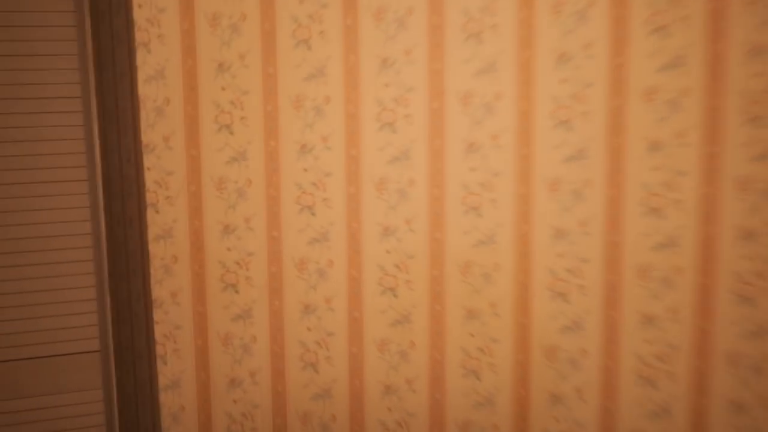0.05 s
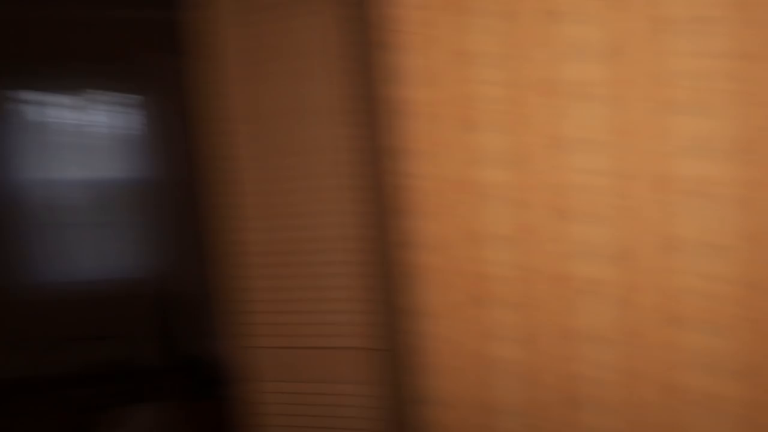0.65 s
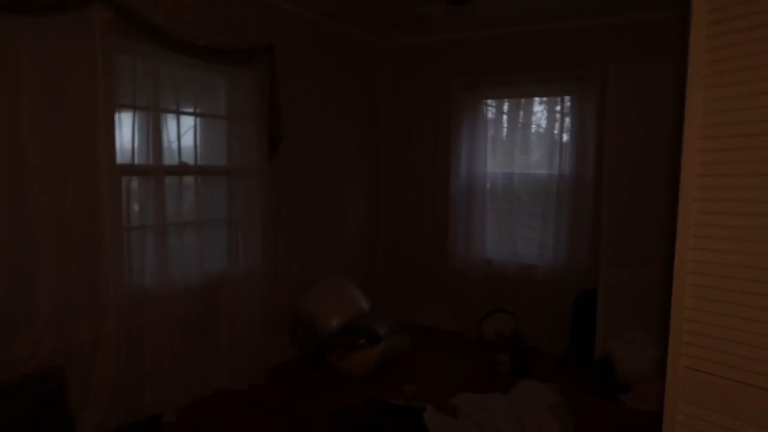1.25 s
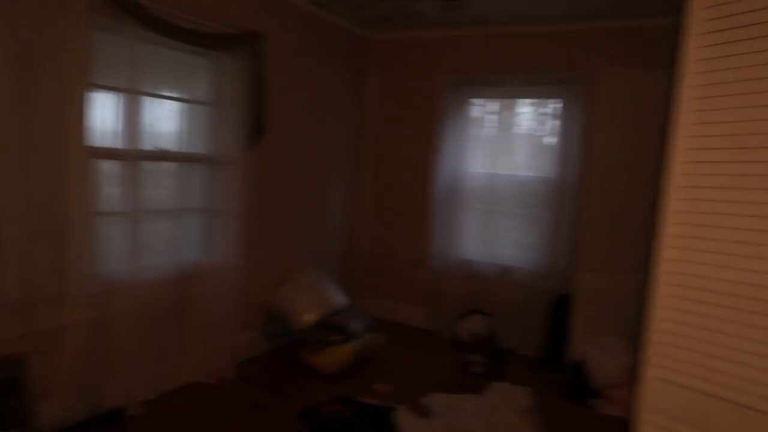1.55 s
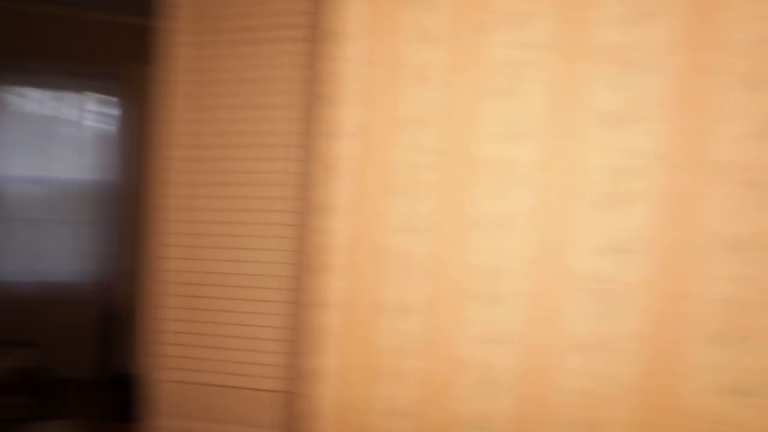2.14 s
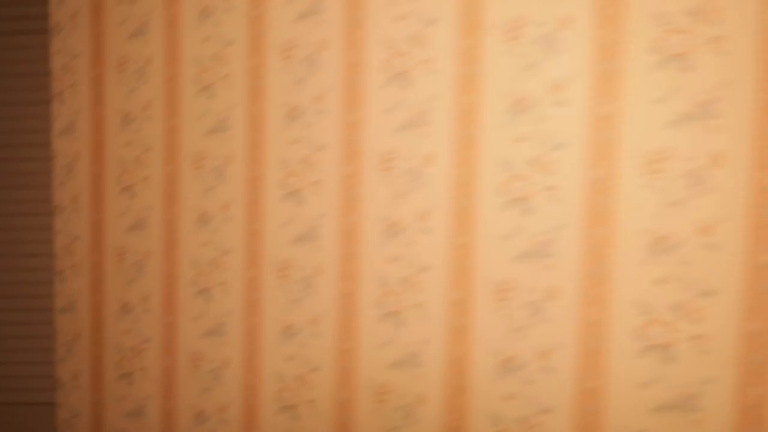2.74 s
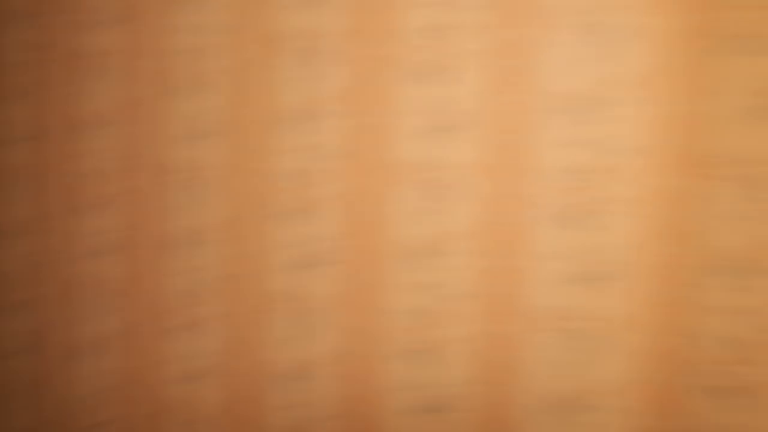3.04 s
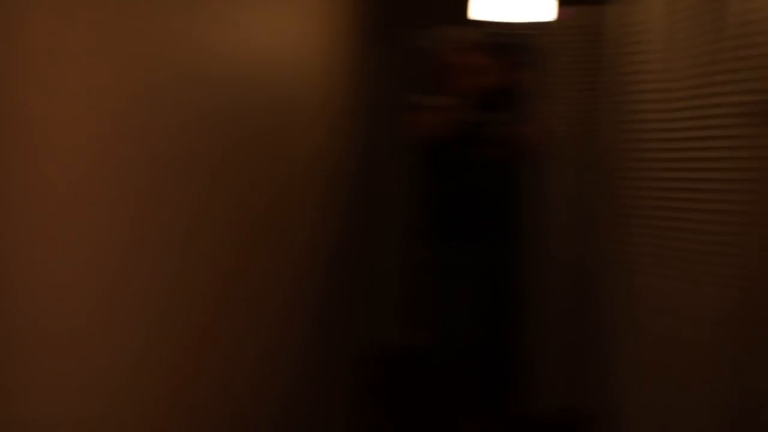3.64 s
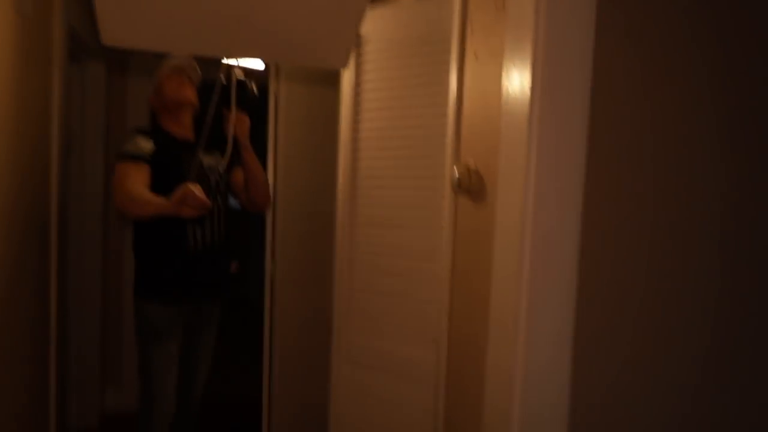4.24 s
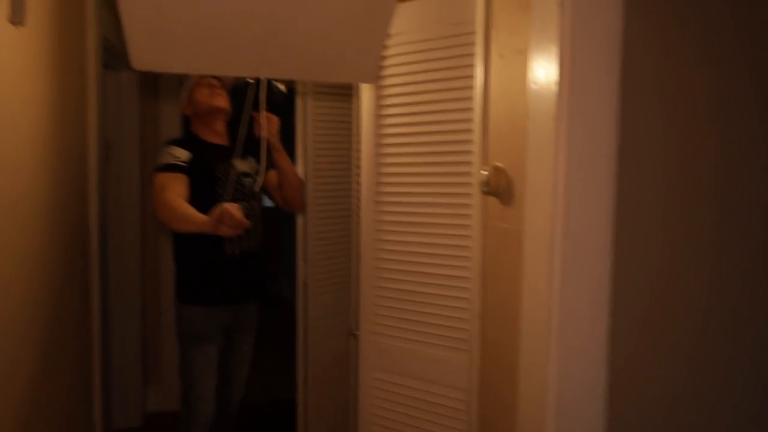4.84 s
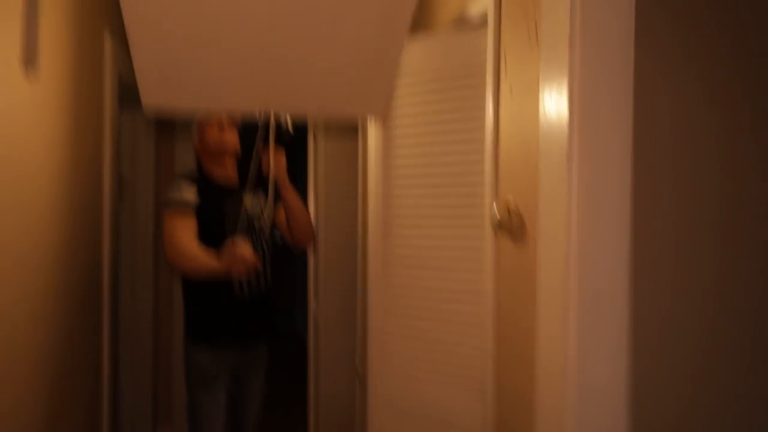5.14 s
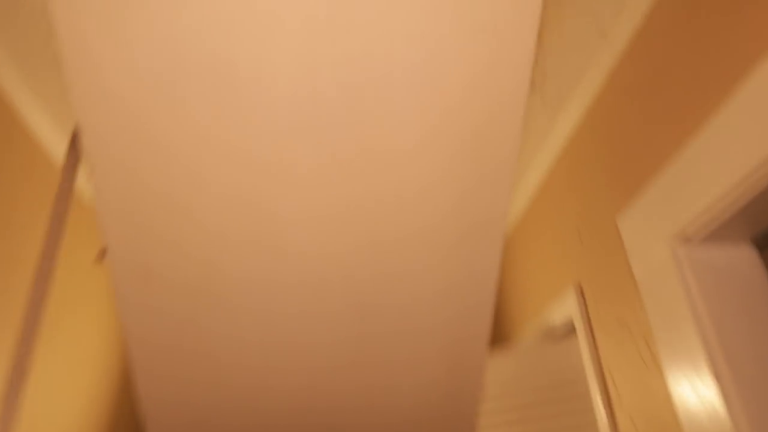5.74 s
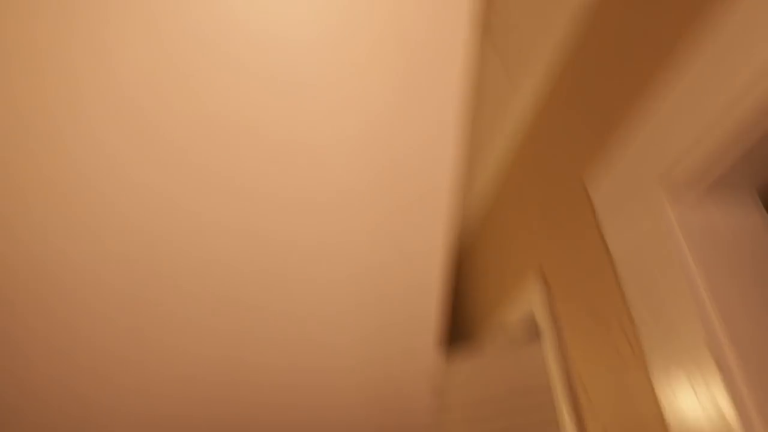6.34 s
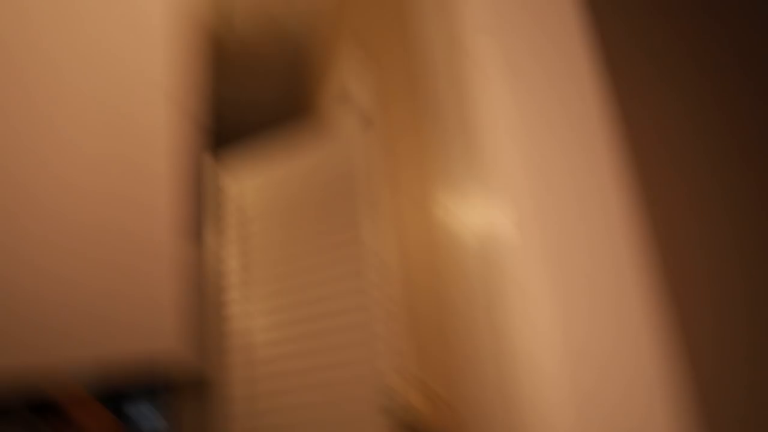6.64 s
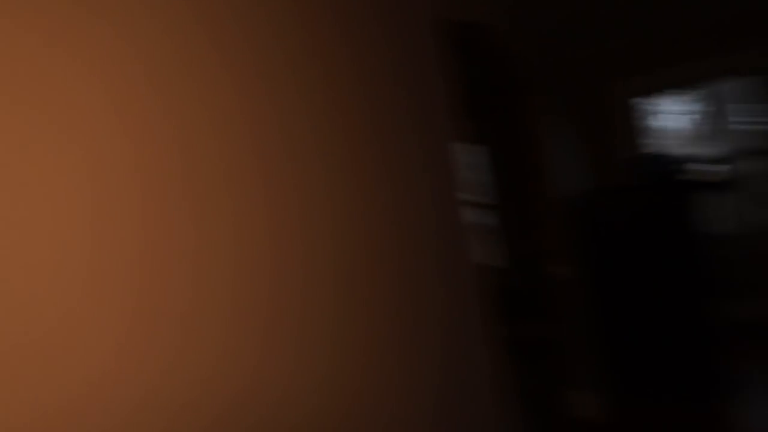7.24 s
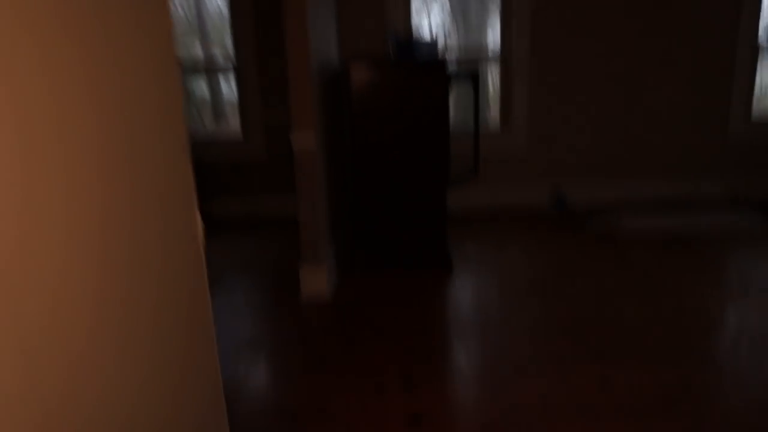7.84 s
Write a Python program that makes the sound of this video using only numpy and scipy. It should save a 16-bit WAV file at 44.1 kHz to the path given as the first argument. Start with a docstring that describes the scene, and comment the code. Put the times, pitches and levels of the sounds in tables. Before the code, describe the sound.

Soft footfalls, scuffs and small clicks open the scene in a slightly echoing wooden hallway. Suddenly the springs of a pull-down attic door twang, then rattle and rasp over a low shuddering groan, leaving a wavering metallic ring. A bright snap from a catch follows, then loud wooden knocks as the sections unfold. Feet thud on the boards near the microphone, with a few thin hinge squeaks and a light stir of clothes.

```python
"""Pulling down a folding attic door

A few steps and light knocks sound in the wooden hallway of an empty house, then the door is pulled down
by its cord. Its coil springs twang on their hooks, rattle as they slip and ring on, while the panel
groans in stick-slip on its hinge. A metal catch snaps, the wooden sections clatter open and feet thud
on the boards nearby. Fittings tick and squeak over a faint stir of clothes and feet."""
import sys
import numpy as np
from scipy import signal
from scipy.io import wavfile
from scipy.ndimage import uniform_filter1d

SR = 44100
rng = np.random.default_rng(int(sys.argv[2]) if len(sys.argv) > 2 else 0)


def to_wav(s):
    """Save 16-bit WAV."""
    ch = np.atleast_2d(s).T  # columns
    pcm = np.round(np.clip(ch, -1, 1) * 32767)  # PCM
    wavfile.write(sys.argv[1], SR, pcm.astype(np.int16))


N = 347534
TIME = np.arange(N) / SR
BANDS_HZ = 28 * 2 ** (np.arange(23) / 2.5)
BASS_HZ, MIDDLE_HZ = 170, 900

def from_db(db):
    """Decibels to gain."""
    return 10 ** (np.asarray(db) / 20)

def unit_power(x):
    """Scale to an average power of one."""
    return x / np.sqrt(np.mean(x ** 2) + 1e-20)

def at_hz(points, hz):
    """Read a curve along log frequency."""
    points = np.array(points)
    return np.interp(np.log(hz), np.log(points[:, 0]), points[:, 1])

def bandpass(x, edges_hz, order=2):
    """Butterworth band filter."""
    return signal.sosfilt(signal.butter(order, edges_hz, "band", fs=SR, output="sos"), x)

def even(x, span_s):
    """Hold the running power at one."""
    power = np.mean(np.atleast_2d(x) ** 2, axis=0)
    return x / np.sqrt(np.abs(uniform_filter1d(power, int(span_s * SR))) + 1e-12)

def drift(per_s):
    """A random wander with a spread near one."""
    return np.interp(TIME * per_s, np.arange(N // 10), rng.standard_normal(N // 10))

def wavering(hz, waver_hz, per_s):
    """A sine with an unsteady pitch."""
    return np.sin(2 * np.pi * np.cumsum(hz + waver_hz * drift(per_s)) / SR)

def swell(s, spread_s):
    """A bell-shaped fade in and out."""
    return np.exp(-.5 * np.minimum(((TIME - s) / spread_s) ** 2, 100))

def stroke(start, end, rise, sag, fall):
    """An envelope that rises to its start, sags until its end, then dies; slopes in dB per second."""
    before, after = np.maximum(start - TIME, 0), np.maximum(TIME - end, 0)
    during = np.clip(TIME - start, 0, end - start)
    return from_db(-rise * before - sag * during - fall * after)

def add(out, s, sound):
    """Mix a sound in at a time."""
    i = int(s * SR)
    out[..., i:i + sound.shape[-1]] += sound[..., :N - i]

def resonate(x, peaks):
    """A chain of resonant peaks and dips."""
    for hz, width, db in peaks:
        a, cos, g = np.pi * width / SR, np.cos(2 * np.pi * hz / SR), from_db(db / 2)
        x = signal.lfilter([1 + a * g, -2 * cos, 1 - a * g], [1 + a / g, -2 * cos, 1 - a / g], x + 1e-18)
    return x

def hump(hz, octaves):
    """Band gains of unit power around a centre."""
    shape = (1 + (np.log2(BANDS_HZ / hz) / octaves) ** 2 / 2) ** -2
    return shape / np.linalg.norm(shape)

# The hallway's stereo image. Each row: frequency in Hz, left-right correlation.
STEREO_LIKENESS = [(30, 0.89), (120, 1), (350, 0.93), (700, 0.78), (1400, 0.58), (2700, -0.0078),
                   (5000, -0.073), (12000, -0.23)]
def diffuse_bands():
    """A bank of stereo noise bands, centred in the bass and wide in the treble."""
    white, bank = rng.standard_normal((2, 2, N)), []
    half_band = np.sqrt(BANDS_HZ[1] / BANDS_HZ[0])
    for k, hz in enumerate(BANDS_HZ):
        mid, side = bandpass(white[k % 2], [hz / half_band, hz * half_band])
        alike = np.clip(at_hz(STEREO_LIKENESS, hz), -.99, .99)
        bank.append(unit_power(np.sqrt(1 + alike) * mid + np.sqrt(1 - alike) * side * [[1], [-1]]))
    return bank

def coloured(bank, spectrum):
    """Steady noise with a given spectrum."""
    mix = sum(band * from_db(at_hz(spectrum, hz)) * np.sqrt(hz) for band, hz in zip(bank, BANDS_HZ))
    return unit_power(np.roll(mix, rng.integers(N), axis=1))

# The hallway's reverb. Each row: frequency in Hz, seconds to fall 60 dB.
HALL_DECAY = [(60, 0.86), (250, 0.71), (700, 0.69), (2000, 0.84), (5000, 0.74), (14000, 0.63)]
def blow(bank, band_gains, ring_s, room_db):
    """Crowded modes start with a crack and die, high ones first; the hallway answers with a tail."""
    t, out, start = TIME[:SR], 0, rng.integers(SR, N - SR)
    for band, hz, gain in zip(bank, BANDS_HZ, band_gains):
        t60 = ring_s * (hz / MIDDLE_HZ) ** -0.092
        crack = 1 + from_db(-12) * np.exp(-t / .005)
        body = from_db(-60 * t / t60) * crack * (1 - np.exp(-t / .0008))
        tail = from_db(room_db - 60 * t / at_hz(HALL_DECAY, hz)) * (1 - np.exp(-t * 100))
        sound = band[:, start:start + SR] * np.hypot(body, tail)
        attack_rms = np.sqrt(np.mean(sound[:, :SR // 30] ** 2))
        out = out + gain * sound / attack_rms
    return out

def contact_modes(count=7, strength_db=5, q=30):
    """Each point of contact favours a few modes and weakens others."""
    pitches = np.exp(rng.uniform(np.log(300), np.log(4000), size=count))
    return [(hz, hz / q, strength_db * (-1) ** k) for k, hz in enumerate(pitches)]

def blows(bank, hits, ring_s, room_db, low_cut_hz, tilt_db, firm_hz=2000, rolloff_order=2.82):
    """Hits on one object: a soft contact is duller and dies sooner, a heavy one adds bass."""
    out = np.zeros((2, N))
    bass = np.interp(np.log(BANDS_HZ), np.log([BASS_HZ, MIDDLE_HZ]), [1, 0])
    tilt = from_db(tilt_db * np.log2(BANDS_HZ))
    low_cut = 1 / np.sqrt(1 + (low_cut_hz / BANDS_HZ) ** 4)
    for s, db, bass_db, hard_hz in hits:
        shape = tilt * np.sqrt(BANDS_HZ / (1 + (BANDS_HZ / hard_hz) ** (2 * rolloff_order)))
        weights = from_db(db + bass_db * bass) * shape / np.linalg.norm(shape) * low_cut
        damped_s = ring_s * min(hard_hz / firm_hz, 1) ** 0.57   # soft contacts stay on and damp the ring
        add(out, s, resonate(blow(bank, weights, damped_s, room_db), contact_modes()))
    return out

# The colour of the room tone. Each row: frequency in Hz, relative density in dB.
AIR_COLOUR = [(15, -38), (25, -25), (64, 13), (166, -8.5), (223, 5.5), (405, -2), (1130, -2), (3520, -48),
              (4610, -16), (14400, -32), (16000, -50)]
def air(bank):
    """The hallway's air is a quiet, steady bed of low noise."""
    return from_db(-50.5) * coloured(bank, AIR_COLOUR)

# How much people move about, in two stretches. Each row: time in seconds, activity in dB.
STIR_CURVES = [
    [(0.0, -49), (0.25, -49), (0.69, -50.5), (0.81, -46.5), (1.69, -55.5), (1.92, -53), (2.08, -48),
     (2.65, -49), (2.9, -49), (3.4, -47.5)],
    [(5.0, -49.5), (5.66, -48.5), (6.26, -41.5), (6.8, -42.5), (6.92, -36), (7.02, -39.5), (7.24, -42.5),
     (7.41, -44), (7.67, -44.5), (7.88, -41)],
]
# The colour of their rustle. Each row: frequency in Hz, relative density in dB.
RUSTLE_COLOUR = [(15, -44), (25, 5), (48, -16), (145, 5), (190, -3), (223, -3), (503, -11), (1440, -12.5),
                 (1890, -15), (2410, -12), (3920, -15), (7110, -28.5), (13600, -36.5), (16000, -50)]
# Its lows, mids and highs. Each row: level in dB at usual activity, exponent on the activity.
STIR_LAYERS = [(-53.5, 2.7), (-49.5, 1.38), (-57, 1.16)]
def stir(bank, usual_db=-48.5, fade_s=0.9, flutter_db=2):
    """Clothes and feet keep the hallway faintly astir; busier movement sounds heavier."""
    noise, activity, out = coloured(bank, RUSTLE_COLOUR), 0, 0
    for curve in STIR_CURVES:
        times, levels_db = np.transpose(curve)
        fade = np.clip(1 + np.minimum(TIME - times[0], times[-1] - TIME) / fade_s, 0, 1)
        activity += fade * from_db(np.interp(TIME, times, levels_db) - usual_db)
    for (db, exponent), edges_hz in zip(STIR_LAYERS, ([42, 400], [400, 2000], [2000, 17000])):
        rustle = unit_power(bandpass(noise, edges_hz, order=3))
        out += activity ** exponent * rustle * from_db(db + flutter_db * drift(30))
    return out

# Ticks of pivots and fittings. Each row: start in seconds, relative level in dB.
PIVOT_TICKS = [(0.094, -47), (2.379, -45), (2.81, -45.5), (2.93, -30.5), (3.122, -48.5), (4.486, -51.5),
               (4.545, -53.5), (4.602, -55.5), (4.721, -54), (4.781, -61), (5.79, -46), (5.815, -52),
               (6.533, -38)]
# The pivots' resonances. Each row: centre in Hz, width in Hz, gain in dB.
PIVOT_MODES = [(5120, 180, 12), (6900, 250, 7)]
def pivot_ticks(bank):
    """Pivots slip with short, dry clicks."""
    out = np.zeros((2, N))
    for s, db in PIVOT_TICKS:
        add(out, s, from_db(db - 4) * blow(bank, hump(6600, octaves=1), ring_s=0.072, room_db=-14))
    return resonate(out, PIVOT_MODES)

# Steps and wood on wood. Each row: start in seconds, relative level in dB, extra bass in dB,
# hardness as a roll-off point in Hz.
WOOD_HITS = [(.163, -29.5, -8, 2050), (.368, -38, -14, 1620), (.654, -25.5, 2, 830),
             (.691, -17, -20.5, 756), (0.768, -43.5, 16, 3500), (0.913, -31.5, 3.5, 5370),
             (1.15, -44, -28, 2220), (1.887, -30.5, 4, 2800), (1.905, -30, 9, 2450), (2.172, -36, 1.5, 340),
             (2.225, -38, 4.5, 400), (2.547, -39, 10, 1120), (2.756, -32, 5, 3400),
             (2.784, -39.5, -2, 4940), (2.907, -33, 4, 7100), (2.929, -33.5, 15.5, 3000),
             (2.955, -21, -1, 594), (5.787, -36.5, 1, 2410), (6.742, -16.5, 7, 2840), (6.802, -12, 3, 3270),
             (6.893, -21, -5, 450), (7.037, -27.5, 9, 2190), (7.148, -31.5, 2, 2100), (7.227, -30, -1, 690),
             (7.744, -26, 1.5, 700), (7.791, -27.5, -6, 800)]
# The wood's resonances. Each row: centre in Hz, width in Hz, gain in dB.
WOOD_MODES = [(240, 177, 3), (444, 360, -3.5), (1170, 140, 1.5), (1440, 470, 1), (1706, 59, 3),
              (2860, 91, -17), (2870, 48, 19.5), (4600, 710, 1.5)]
def wood_knocks(bank):
    """Steps, knocks and the unfolding sections set the wood ringing."""
    hits = blows(bank, WOOD_HITS, ring_s=0.36, room_db=-6.5, low_cut_hz=89.5, tilt_db=-0.58)
    return from_db(-2.5) * resonate(hits, WOOD_MODES)

# Brief slides. Each row: midpoint in seconds, spread in seconds, level in dB, centre in Hz.
SLIDES = [(.31, 0.057, -49.5, 2750), (.96, 0.055, -45, 5060), (1.12, 0.12, -48, 2400),
          (1.28, 0.044, -45, 666), (1.482, 0.03, -39.5, 2320), (2.241, 0.02, -43.5, 2480),
          (2.42, 0.044, -42.5, 2380), (5.44, 0.017, -43.5, 2270), (5.629, 0.017, -44.5, 2980),
          (6.48, 0.067, -37.5, 1560), (7.665, 0.043, -38, 2400), (7.87, 0.062, -38.5, 2540)]
def scuffs(bank, grain_db=2.5, room_db=-9, room_t60=0.53):
    """Sliding contacts swell and fade, grainy with friction; the hallway carries each one on."""
    out = np.zeros((2, N))
    for s, spread, db, hz in SLIDES:
        near = slice(max(int((s - 4 * spread) * SR), 0), int((s + room_t60) * SR))
        hiss = sum(gain * band[:, near] for gain, band in zip(hump(hz, octaves=0.8), bank))
        t = TIME[near] - s
        tail = (t > 0) * from_db(room_db - 60 * np.abs(t) / room_t60)
        out[:, near] += from_db(db) * hiss * np.maximum(swell(s, spread)[near], tail)
    return out * from_db(grain_db * drift(200))

# Swells of a hum. Each row: midpoint in seconds, spread in seconds, level in dB.
HUM_SWELLS = [(.48, .09, -49.5), (1.3, 0.13, -55), (1.6, .11, -51.5)]
def hum(hz=234, flutter_db=3):
    """A faint low tone wavers in the house, coming and going."""
    level = sum(from_db(db) * swell(s, spread) for s, spread, db in HUM_SWELLS)
    tone = np.sqrt(2) * wavering(hz, waver_hz=6, per_s=28.13)
    return level * tone * from_db(flutter_db * drift(12.7))

# Close, soft blows on the boards. Each row: start in seconds, level in dB, pitch in Hz,
# seconds to fall 60 dB.
BOARD_THUDS = [(0.69, -19.5, 113, 0.048), (0.769, -26, 282, 0.064), (.915, -32.5, 323, 0.43),
               (2.547, -25.5, 152, 0.085), (2.606, -24.5, 140, .09), (2.956, -23, 179, 0.25),
               (4.002, -9, 370, 0.035), (5.786, -28.5, 224, 0.16), (5.788, -23, 494, 0.085),
               (6.501, -11.5, 211, 0.074), (6.529, -10.5, 222, 0.079), (6.751, -11.5, 208.7, 0.26),
               (6.811, -13.5, 191, 0.26), (7.226, -22, 438, 0.05), (7.745, -9.5, 204, 0.04)]
def board_thuds(bank, overtone_ratio=1.3):
    """A soft blow rocks a board in its two lowest modes; the contact adds a dull tap."""
    out, t = np.zeros((2, N)), TIME[:SR // 2]
    for s, db, hz, t60 in BOARD_THUDS:
        phase = 2 * np.pi * hz * t
        modes = np.sin(phase) + from_db(-6) * np.sin(overtone_ratio * phase)
        add(out, s, modes * from_db(db - 60 * t / t60) * (1 - np.exp(-t / .0008)))
        tap = blow(bank, hump(1.66 * hz, octaves=0.99), ring_s=1.5 * t60, room_db=-13)
        add(out, s, from_db(db - 21) * tap)
    return out

# Thin squeaks. Each row: midpoint in seconds, spread in seconds, relative level in dB, pitch in Hz,
# glide in Hz per second.
HINGE_SQUEAKS = [(.88, .02, -58, 14600, -3000), (3.56, 0.044, -31, 4440, -1), (5.1, 0.31, -59, 4480, -2.5),
                 (6.51, 0.05, -41, 4420, -500), (7.665, 0.049, -36, 2090, -500),
                 (7.675, 0.045, -40, 2950, -500), (7.825, .03, -36.5, 1970, -6)]
def hinge_squeaks(roughness=0.05):
    """Dry hinges rub in rough, sliding tones, wide because they are mostly heard off the walls."""
    out = np.zeros((2, N))
    for s, spread, db, hz, glide in HINGE_SQUEAKS:
        pitch = hz + glide * np.clip(TIME - s, -1, 1)
        rub = np.array([wavering(pitch, roughness * hz, per_s=400) * drift(300) for side in range(2)])
        out += from_db(db) * swell(s, spread) * rub
    return out

# Twangs. Each row: start in seconds, relative level in dB, extra bass in dB, hardness in Hz.
HOOK_HITS = [(3.436, -10.5, -10.5, 3800), (3.474, -11.5, -6, 2860), (3.498, -15, 2, 274),
             (3.624, -17, -25, 2750), (3.654, -14.5, -5, 2160), (3.766, -20, -5, 2300)]
# The hooks' resonances. Each row: centre in Hz, width in Hz, gain in dB.
HOOK_MODES = [(1000, 500, -4), (1590, 70, 9), (1734, 40, 7), (2360, 150, 9), (3074, 120, 3), (3402, 130, 4),
              (4000, 500, -4), (5233, 300, 5)]
def hook_twangs(bank):
    """The coils jump on their hooks and ring them, a little to the right."""
    hits = blows(bank, HOOK_HITS, ring_s=0.17, room_db=-10, low_cut_hz=80, tilt_db=-1.5)
    return from_db(-4) * resonate(hits, HOOK_MODES) * from_db([[-1], [1]])

# Pushes that make the panel shudder. Each row: start in seconds, end in seconds, level in dB.
PANEL_PUSHES = [(3.468, 4.547, -24), (6.21, 6.5, -35.5)]
def panel_groan(bank, hz=131, jitter=0.0423, lock_db=10):
    """The hinge sticks and slips at the panel's lowest mode, over a looser rumble."""
    phase = 2 * np.pi * np.cumsum(hz * (1 + jitter * drift(30))) / SR
    tone = unit_power(np.sin(phase) + from_db(-19.5) * np.sin(2 * phase))
    locked = swell(4.49, spread_s=0.074)   # the slips fall into step: louder and more tonal
    rumble = coloured(bank, [(25, -41), (55, -11.5), (85, -12.5), (115, 5.5), (160, -6), (240, -8),
                             (600, -72.5), (2000, -100)])   # Hz, dB
    shudder = (from_db(-4) + locked) * tone + (1 - 0.74 * locked) * even(rumble, span_s=0.076)
    effort = sum(from_db(db) * stroke(start, end, rise=79, sag=2.5, fall=45)
                 for start, end, db in PANEL_PUSHES)
    return effort * from_db(lock_db * locked) * even(shudder, span_s=0.27)

# The colour of the spring wire. Each row: frequency in Hz, relative density in dB.
WIRE_COLOUR = [(150, -5.5), (200, 10.5), (500, -11.5), (1000, -10), (1700, -14.5), (2350, -15),
               (2900, -17.5), (4800, -30.5), (7000, -38.5), (10000, -43.5), (15500, -46)]
# The coils' resonances. Each row: centre in Hz, width in Hz, gain in dB.
COIL_MODES = [(402, 12, 11), (483, 35, 5), (641, 55, 5), (1114, 25, 6), (1230, 50, 3), (1660, 140, 3),
              (2350, 110, 8), (4559, 200, 6)]
# The rattle's lows, mids and highs. Each row: opening level in dB, sag in dB per second as the pull
# slows, fall in dB per second once it stops.
RATTLE_LAYERS = [(-25.5, 7, 36.5), (-18, 7, 47), (-25, 13, 59)]
def spring_rattle(bank, pull_s=(3.5, 4.41), slips_per_s=45, spread_db=4, hiss_db=-9):
    """Stretching coils slip at random and ring hundreds of wire modes; the bright ones fade first."""
    t, wire, out = TIME[:SR // 3], 0, 0
    for hz, (side, detune, cycles) in zip(np.geomspace(150, 15500, 600), rng.standard_normal((600, 3))):
        apart = np.arccos(at_hz(STEREO_LIKENESS, hz)) * np.sign(side) / 2
        phase = 2 * np.pi * (hz * (1 + .003 * detune) * t + cycles) + np.array([[apart], [-apart]])
        t60 = np.sqrt(MIDDLE_HZ / hz)
        wire += np.sqrt(hz) * from_db(at_hz(WIRE_COLOUR, hz) - 60 * t / t60) * np.sin(phase)
    slips = (rng.random(N) < slips_per_s / SR) * from_db(spread_db * rng.standard_normal(N).clip(-2, 2))
    ringing = even(signal.fftconvolve(slips[None], wire, axes=1)[:, :N], span_s=0.037)
    rattle = resonate(ringing + from_db(hiss_db) * coloured(bank, WIRE_COLOUR), COIL_MODES)
    for (db, sag, fall), edges_hz in zip(RATTLE_LAYERS, ([170, 450], [450, 1500], [1500, 17000])):
        layer = even(bandpass(rattle, edges_hz, order=4), span_s=0.09)
        out += from_db(db) * stroke(*pull_s, rise=500, sag=sag, fall=fall) * layer
    return out

# Spring hooks rasping in their eyes. Each row: start in seconds, relative level in dB.
HOOK_RASPS = [(4.0275, -38), (4.1232, -43), (4.158, -37.5), (4.2254, -40), (4.2837, -37), (4.3777, -38),
              (4.4194, -41)]
# The wire eyes' resonances. Each row: centre in Hz, width in Hz, gain in dB.
EYE_MODES = [(2190, 110, 24), (2950, 210, 18), (3700, 100, 1), (4990, 150, 7), (6360, 160, 8),
             (7260, 170, -6), (10400, 400, -3)]
def hook_rasps(bank, slip_s=.006, weaker_db=0.5):
    """Each rasp is a quick, uneven run of four slips that rings the wire eyes."""
    out = np.zeros((2, N))
    for s, db in HOOK_RASPS:
        for k, delay in enumerate(np.cumsum(slip_s * rng.uniform(0.54, 1.4, size=4))):
            slip = blow(bank, hump(4200, octaves=1.17), ring_s=0.08, room_db=-14)
            add(out, s + delay - slip_s, from_db(db - 9 - k * weaker_db) * slip)
    return resonate(out, EYE_MODES)

# The note that lingers in the springs. Each row: pitch in Hz, relative level in dB.
WIRE_PARTIALS = [(528, 2.5), (587, -2), (646, -1), (1265, 0), (1314, 3), (1331, 9), (1410, -3), (1459, -2)]
# Nudges from the settling coils. Each row: start in seconds, boost in dB.
COIL_NUDGES = [(4.86, 3), (5.07, 3), (5.28, 7.5), (5.41, 8)]
def spring_ring(level_db=-35.5, nudge_s=0.021):
    """A few lightly damped wire modes linger, beating together; each nudge revives them briefly."""
    tone = sum(from_db(db + 2 * drift(23)) * wavering(hz, waver_hz=10, per_s=90)
               for hz, db in WIRE_PARTIALS)
    revived_db = sum(db * (TIME > s) * np.exp(-np.abs(TIME - s) / nudge_s) for s, db in COIL_NUDGES)
    envelope = stroke(4.32, 5.85, rise=90, sag=13.5, fall=70)
    return from_db(level_db + revived_db) * envelope * even(tone, span_s=0.17)

# Catch clicks. Each row: start in seconds, relative level in dB, extra bass in dB, hardness in Hz.
CATCH_HITS = [(6.017, -22, -32, 1400), (6.023, -12, 10, 6350), (6.03, -19, 5, 4000)]
# The catch's resonances. Each row: centre in Hz, width in Hz, gain in dB.
CATCH_MODES = [(1923, 98, 11), (2758, 54, 13.5), (3080, 140, 1.5), (3710, 100, 8.5), (4570, 210, 12),
               (5520, 650, 6), (6530, 500, 8), (8060, 95, -9)]
def catch_snap(bank):
    """The metal catch touches, snaps and seats with a short, bright ring."""
    hits = blows(bank, CATCH_HITS, ring_s=0.1, room_db=-16.5, low_cut_hz=152, tilt_db=1.5)
    return from_db(-5) * resonate(hits, CATCH_MODES) * from_db([[.8], [-.8]])

def scene():
    """Everything in the hallway, the action a little to the right of the hum and room tone."""
    bank = diffuse_bands()
    wood = wood_knocks(bank)
    metal = hook_twangs(bank) + catch_snap(bank) + from_db(-2.5) * spring_rattle(bank) + spring_ring()
    panel = from_db(-1.06) * panel_groan(bank)
    fittings = pivot_ticks(bank) + hook_rasps(bank) + hinge_squeaks()
    people = board_thuds(bank) + scuffs(bank) + stir(bank)
    return (wood + metal + panel + fittings + people) * from_db([[-.55], [.55]]) + hum() + air(bank)

def record(dry, cutoff_hz=15900):
    """Peaks clip at full scale and a steep low-pass takes off the very top."""
    lowpass = signal.ellip(10, .1, 70, cutoff_hz, fs=SR, output="sos")
    return signal.sosfilt(lowpass, np.clip(dry, -1, 1))

dry = scene()
out = record(dry)
to_wav(out)
```